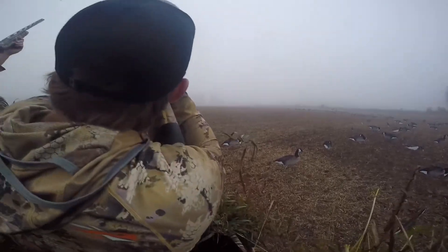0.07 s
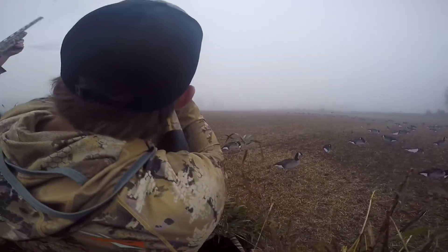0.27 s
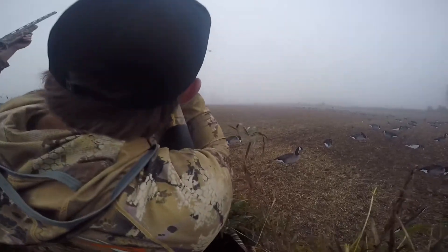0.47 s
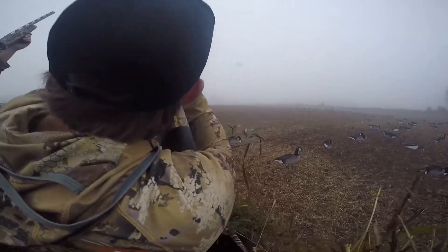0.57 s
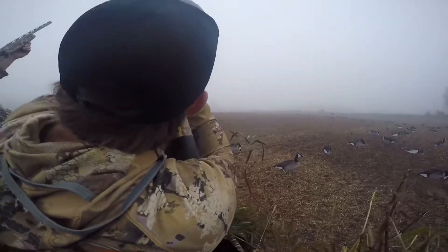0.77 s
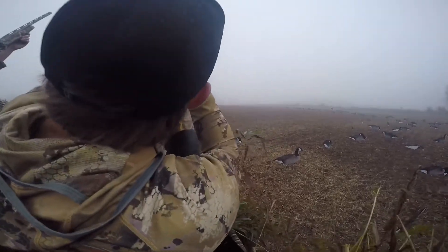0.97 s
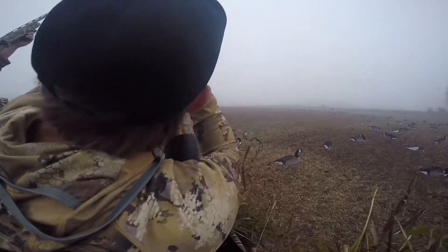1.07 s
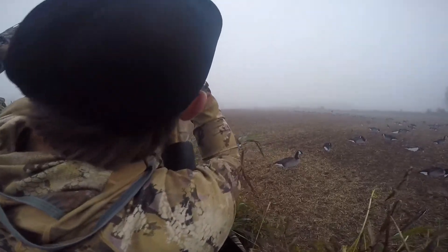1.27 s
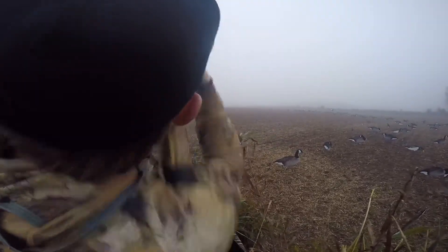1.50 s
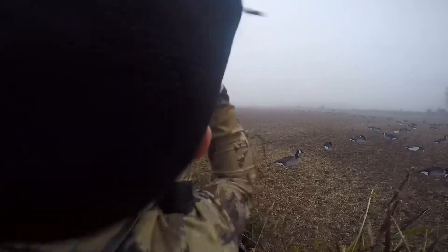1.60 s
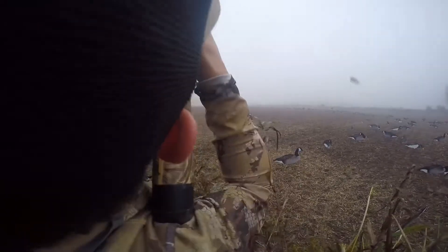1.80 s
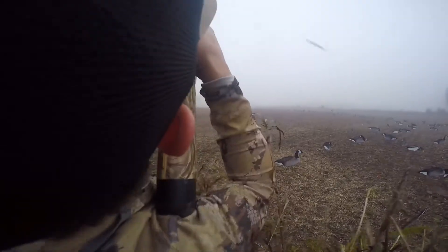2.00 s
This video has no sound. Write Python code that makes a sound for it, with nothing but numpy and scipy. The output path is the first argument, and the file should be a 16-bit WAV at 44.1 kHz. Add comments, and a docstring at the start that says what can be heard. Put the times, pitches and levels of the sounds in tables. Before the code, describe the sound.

Four sharp shotgun blasts go off in two quick pairs, close enough to overload the microphone. Faint echoes return across an open field, and grass and clothing rustle very softly in the pause between the pairs.

```python
"""Four shotgun blasts in two quick pairs, close by, over a foggy stubble field.
Each overloads a small camera's microphone, rings briefly at its own pitches, bounces once off
the hunters' hide and scatters through the stalks. Faint echoes return from across the field.
Dry grass and clothing rustle over still air and a low rumble; a gun part ticks, a hunter shifts."""
import sys
import numpy as np
from scipy import signal
from scipy.fft import rfft, irfft
from scipy.io import wavfile

SR = 44100
rng = np.random.default_rng(int(sys.argv[2]) if len(sys.argv) > 2 else 0)


def store_wav(level_fs):
    """Save 16-bit WAV to argv[1]."""
    pcm = np.round(np.clip(np.atleast_2d(level_fs), -1, 1) * 32767)
    wavfile.write(sys.argv[1], SR, pcm.T.astype(np.int16))


N = 90404

# low mids of a blast (frequency [Hz], relative density [dB])
BARK_SPECTRUM = [(100, -12), (250, -2.5), (370, 0), (470, -7.5), (570, -3.5), (760, -8.5), (950, -3),
                 (1120, -0.5), (1300, -14.5), (2000, -20.5), (8000, -46)]


def undb(db):
    """Decibels to gain."""
    return 10 ** (np.asarray(db) / 20)


def clock(start_s=0):
    """Seconds since start_s, per sample."""
    return np.arange(N) / SR - start_s


def noise(spectrum):
    """Unit-rms noise shaped by (frequency [Hz], relative density [dB]) points."""
    hz, db = np.array(spectrum).T
    bins_hz = np.maximum(np.arange(N // 2 + 1) * SR / N, 1)
    gain = undb(np.interp(np.log(bins_hz), np.log(hz), db))
    x = irfft(rfft(rng.standard_normal(N)) * gain, N)
    return x / x.std()


def flicker(depth_db, rate_hz):
    """Randomly wandering gain."""
    steps = rng.standard_normal(4096)
    return undb(depth_db * np.interp(clock() * rate_hz, np.arange(len(steps)), steps))


def burst(peak_s, rise_s, fade_s, hold_s=0):
    """Envelope: exponential rise to peak_s, hold, exponential fade."""
    t = clock(peak_s)
    return np.exp(np.minimum(t, 0) / rise_s - np.maximum(t - hold_s, 0) / fade_s)


def ring(start_s, hz, fade_s):
    """Damped sine."""
    t = np.maximum(clock(start_s), 0)
    return np.sin(2 * np.pi * hz * t) * np.exp(-t / fade_s)


def curve(points):
    """Gain along (time [s], level [dB]) points."""
    return undb(np.interp(clock(), *np.array(points).T))


def field():
    """Still air and a faint low rumble that swells and sinks."""
    # air and rumble spectra (frequency [Hz], relative density [dB])
    air_spectrum = [(20, -2), (55, -2.5), (100, -12.5), (180, -16), (320, -25.5), (900, -24), (1400, -23.5),
                    (2000, -21), (3100, -21.5), (4200, -27.5), (8000, -36), (15000, -43)]
    rumble_spectrum = [(20, 3), (55, 2.5), (100, -4.5), (180, -9), (300, -15.5), (700, -42.5), (2000, -68)]
    # rumble envelope (time [s], level [dB])
    rumble_level = [(0, -67), (.22, -60.5), (.46, -52.5), (.56, -80), (.65, -74), (.8, -75.5), (1.1, -76.5),
                    (1.4, -63.5), (1.59, -49), (1.68, -64), (1.78, -55.5), (1.85, -70), (2.05, -76)]
    return undb(-67.5) * noise(air_spectrum) + curve(rumble_level) * noise(rumble_spectrum)


def rustle():
    """Grass and clothing rub as the hunters swing their guns."""
    # rustle spectrum (frequency [Hz], relative density [dB])
    spectrum = [(150, -9), (500, -14), (800, -18.5), (1100, -13), (1400, -16), (1900, 1), (2600, -3.5),
                (3300, -1), (4000, -11), (5200, -14), (8000, -25), (15000, -31)]
    # rustle envelope (time [s], level [dB])
    level = [(0, -59.5), (.17, -61.5), (.23, -68.5), (.7, -67.5), (.78, -84), (.97, -71.5), (1.14, -79.5),
             (1.18, -63), (1.30, -61), (1.48, -56.5), (1.53, -69), (1.82, -70), (2.05, -70.5)]
    return curve(level) * noise(spectrum) * flicker(depth_db=1.5, rate_hz=80)


def gust(start_s, length_s):
    """Slow pressure wave of the muzzle gas: a push, then a longer suction."""
    u = np.maximum(clock(start_s), 0) / length_s
    return u * (1 - u / 2) * np.exp(-u)


def scatter_envelope(peak_s, rise_s):
    """Scatter off the stalks: a fast fade, plus a slow one ending at the edge of the near ground."""
    reach_s, edge_s = 0.12, 0.008
    edge = (1 - np.tanh((clock(peak_s) - reach_s) / edge_s)) / 2
    early = burst(peak_s, rise_s, fade_s=0.012)
    late = undb(-14) * edge * burst(peak_s, rise_s, fade_s=0.045)
    return early + late


def shots():
    """Muzzle blasts: crack, two rings, bark, thump and gust; a bounce off the hide; stubble scatter."""
    # blasts (time [s], crack [dB], rise [s], hold [s], lower ring [Hz], lower ring [dB],
    #   upper ring [Hz], upper ring [dB], bark [dB], thump [dB], thump [Hz], gust gain [dB],
    #   gust length [s], bounce delay [s], bounce crack [dB], bounce thump [dB], scatter [dB])
    blasts = [(.2411, 0, 0.00088, .0028, 2266, -5.5, 3194, -1.5, -13.5, -15.5, 210, 11, .0037, 0.0062, -14, -27.5, -17.5),
              (0.3356, -8.5, .0004, 0.001, 1869, -2.5, 3470, -10, -17.5, -8.5, 180, -10, 0.0033, 0.011, -21.5, -31.5, -21),
              (1.5204, -1.5, .0009, 0.0043, 2626, 1.5, 3046, -8.5, -20, -15, 190, -8, 0.0016, .0148, -15.5, -10, -20.5),
              (1.7147, -5.5, 0.00089, 0.00072, 2346, -5.5, 3370, -8.5, -23, -9.5, 150, -19.5, .0030, 0.0082, -25.5, -16, -27.5)]
    # crack and stubble scatter spectra (frequency [Hz], relative density [dB])
    crack_spectrum = [(150, -12.5), (500, -14.5), (750, -22.5), (1050, -12), (1300, -22), (1500, -19),
                      (1850, -1), (2600, -1.5), (3400, -2.5), (4100, -10.5), (4900, -9.5), (6000, -17),
                      (8000, -17), (12000, -28.5), (16000, -32.5)]
    scatter_spectrum = [(60, -2.5), (200, -4), (400, -11), (750, -16.5), (1100, -11.5), (1400, -16.5),
                        (1900, -1.5), (3100, -2.5), (4000, -8.5), (5000, -7.5), (7000, -14), (11000, -17),
                        (16000, -28)]
    crack_fade_s, bark_fade_s, thump_fade_s, bounce_fade_s = 0.0018, 0.0052, 0.0045, 0.004
    gust_delay_s, scatter_delay_s = 0.0025, 0.002
    reflection_rise_s, thump_lead_s = 0.0021, 0.0044
    crack = noise(crack_spectrum)
    bark = noise(BARK_SPECTRUM)
    scatter = noise(scatter_spectrum) * flicker(depth_db=2.5, rate_hz=300)
    out = np.zeros(N)
    for (at_s, crack_db, rise_s, hold_s, lower_hz, lower_db, upper_hz, upper_db, bark_db, thump_db,
         thump_hz, gust_db, gust_s, delay_s, bounce_db, bounce_thump_db, scatter_db) in blasts:
        phase_per_hz = 2 * np.pi * clock(at_s)
        rings = undb(lower_db) * np.sin(lower_hz * phase_per_hz)
        rings += undb(upper_db) * np.sin(upper_hz * phase_per_hz)
        out += (undb(crack_db) * crack + rings) * burst(at_s, rise_s, crack_fade_s, hold_s)
        out += undb(bark_db) * bark * burst(at_s, rise_s, bark_fade_s, hold_s)
        out += undb(thump_db) * ring(at_s, thump_hz, thump_fade_s)
        out += undb(gust_db) * gust(at_s + gust_delay_s, gust_s)
        bounce_s = at_s + delay_s
        out += undb(bounce_db) * crack * burst(bounce_s, reflection_rise_s, bounce_fade_s)
        out += undb(bounce_thump_db) * ring(bounce_s - thump_lead_s, thump_hz, thump_fade_s)
        out += undb(scatter_db) * scatter * scatter_envelope(at_s + scatter_delay_s, reflection_rise_s)
    return out


def echoes():
    """Dull, smeared returns of the shots from rough ground and distant trees."""
    # returns (time [s], level [dB], rise [s], fade [s], low mids [dB])
    returns = [(0.472, -44, .022, 0.039, -64.5), (0.532, -53.5, .003, 0.01, -59.5),
               (.582, -57, .02, 0.048, -68), (.645, -64.5, .005, 0.01, -89),
               (.692, -65.5, .005, 0.035, -68), (.804, -55, .006, 0.017, -73.5),
               (.893, -58.5, .006, 0.033, -66), (1.58, -45.5, 0.004, 0.0093, -69),
               (1.615, -47, .006, 0.0028, -76), (1.662, -49.5, .010, 0.033, -75),
               (1.774, -46.5, .004, .008, -72.5), (1.807, -55, 0.0043, 0.0035, -79),
               (1.859, -50.5, 0.011, 0.024, -74), (1.918, -60, .004, .012, -75),
               (1.965, -59.5, 0.017, .022, -82)]
    # echo spectrum (frequency [Hz], relative density [dB])
    spectrum = [(100, -6), (200, -7.5), (350, -18), (600, -17.5), (780, -24), (1140, -12), (1400, -16),
                (1900, -1.5), (3000, 1), (3900, -8.5), (5200, -11), (8000, -23.5), (15000, -42)]
    level = sum(undb(db) * burst(at_s, rise_s, fade_s) for at_s, db, rise_s, fade_s, _ in returns)
    low_level = sum(undb(db) * burst(at_s, rise_s, fade_s=0.0042) for at_s, _, rise_s, _, db in returns)
    smear = level * noise(spectrum) + low_level * noise(BARK_SPECTRUM)
    return smear * flicker(depth_db=2, rate_hz=220)


def gun_tick():
    """A gun part ticks once and rings in its modes."""
    # modes (frequency [Hz], level [dB], t60 [s])
    modes = [(470, -64.5, 0.27), (1150, -66.5, 0.19), (5040, -46.5, 0.011), (7110, -49, .008),
             (9820, -57.5, 0.0076), (14400, -60, 0.0063)]
    at_s = 1.2153
    return sum(undb(db) * ring(at_s, hz, t60_s / np.log(1000)) for hz, db, t60_s in modes)


def scuff():
    """Soft scuff as a hunter shifts his weight."""
    # scuff spectrum (frequency [Hz], relative density [dB])
    spectrum = [(60, -2.5), (180, -1.5), (300, -8), (500, 2.5), (650, -4), (850, -9), (1100, -1),
                (1500, -14), (6000, -35)]
    return undb(-64.5) * noise(spectrum) * burst(peak_s=1.35, rise_s=0.021, fade_s=0.03)


def scene():
    """All sources at one microphone."""
    return (shots() + echoes() + rustle() + gun_tick() + scuff() + field())[None]


def record(dry):
    """The camera clips the blasts just under full scale, then cuts the top."""
    ceiling, cutoff_hz = 0.93, 15600
    lowpass = signal.ellip(12, 0.1, 80, cutoff_hz, fs=SR, output="sos")
    return signal.sosfilt(lowpass, np.clip(dry, -ceiling, ceiling))


dry = scene()
out = record(dry)
store_wav(out)
```